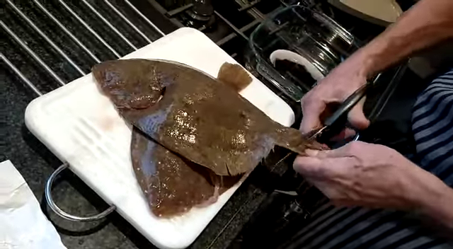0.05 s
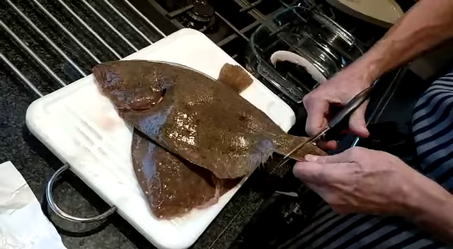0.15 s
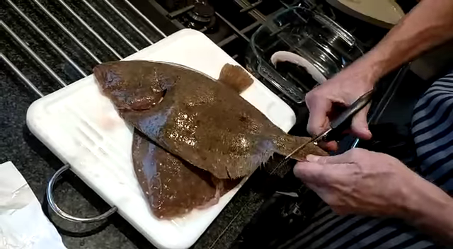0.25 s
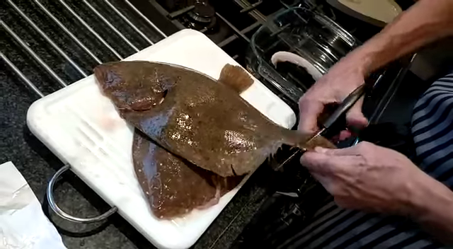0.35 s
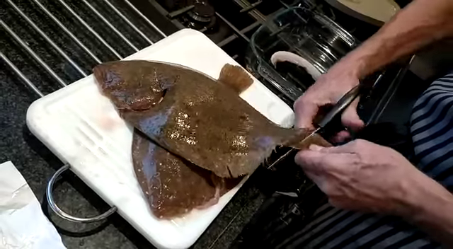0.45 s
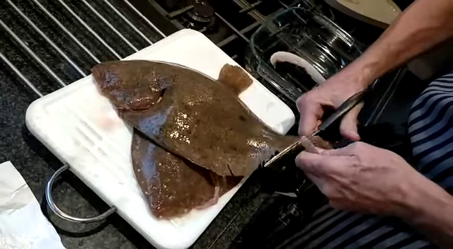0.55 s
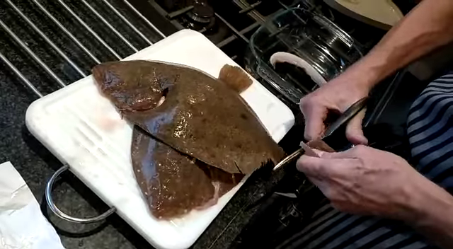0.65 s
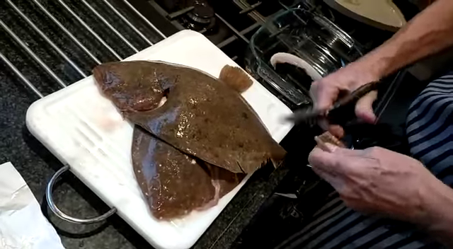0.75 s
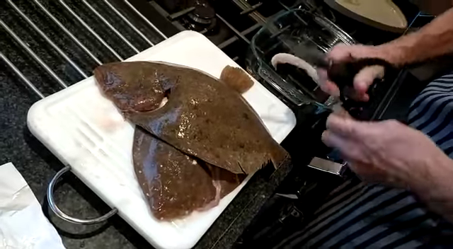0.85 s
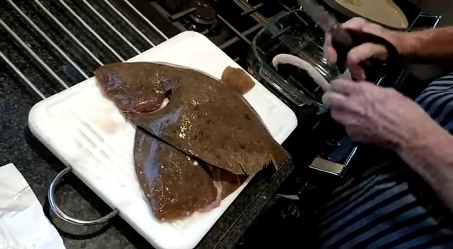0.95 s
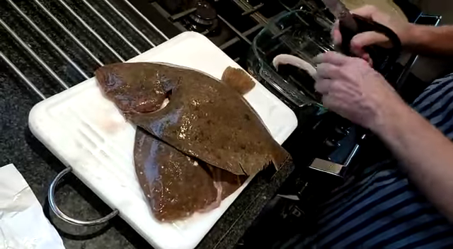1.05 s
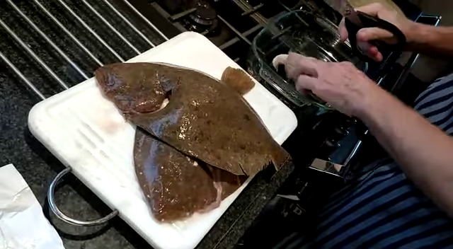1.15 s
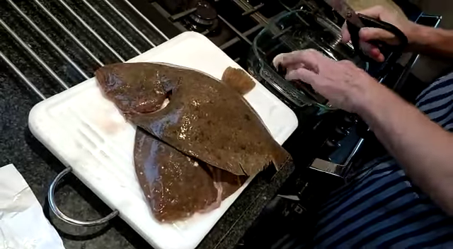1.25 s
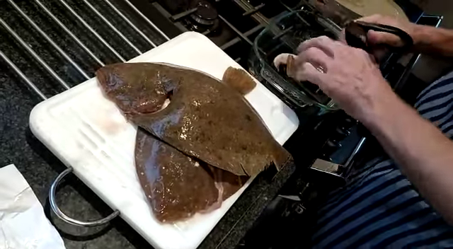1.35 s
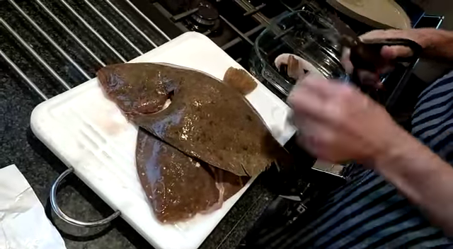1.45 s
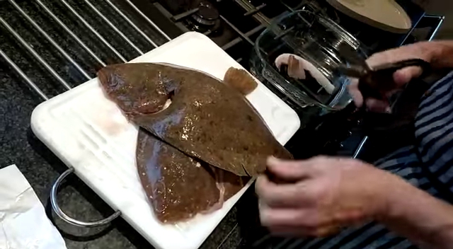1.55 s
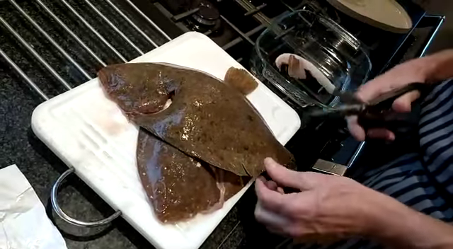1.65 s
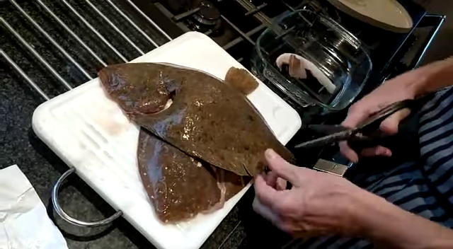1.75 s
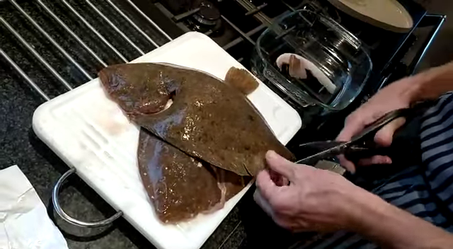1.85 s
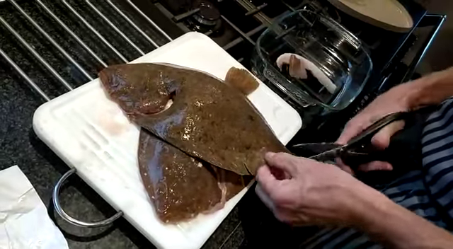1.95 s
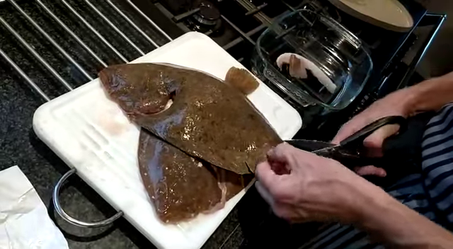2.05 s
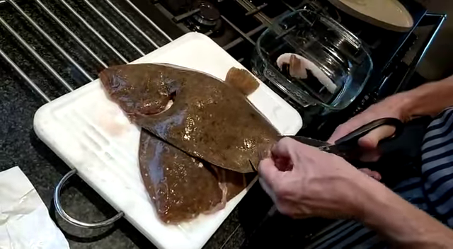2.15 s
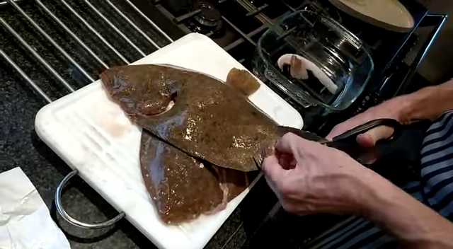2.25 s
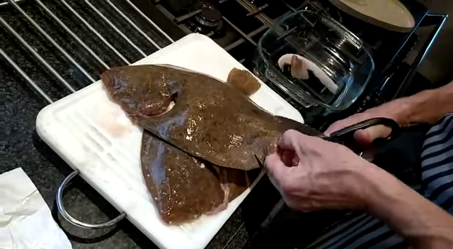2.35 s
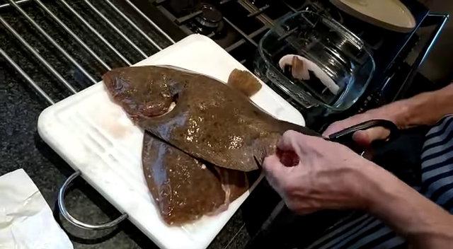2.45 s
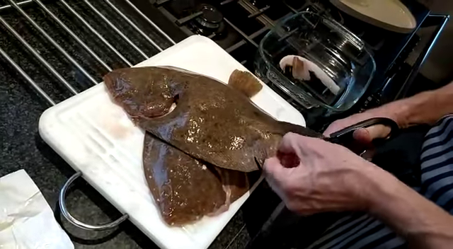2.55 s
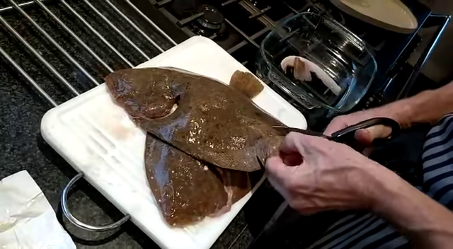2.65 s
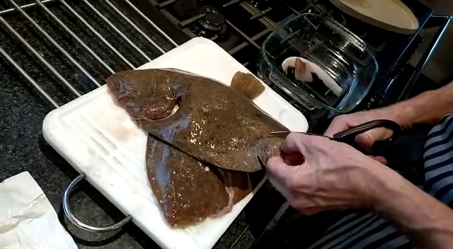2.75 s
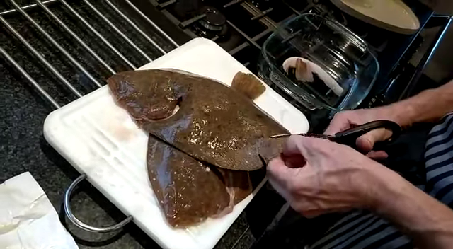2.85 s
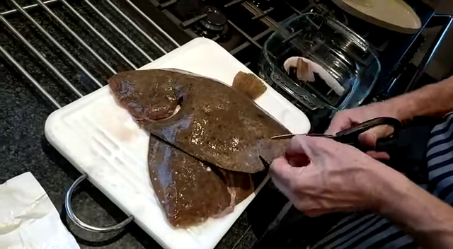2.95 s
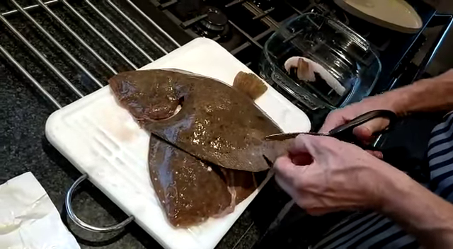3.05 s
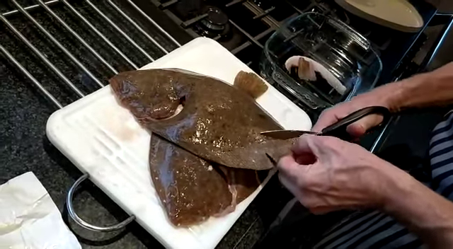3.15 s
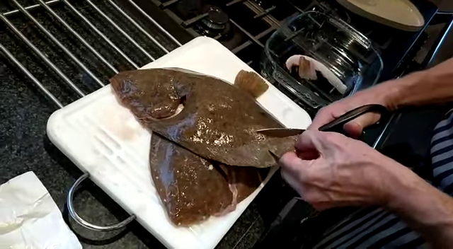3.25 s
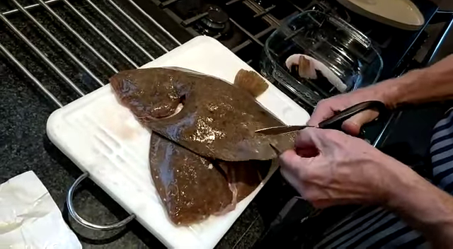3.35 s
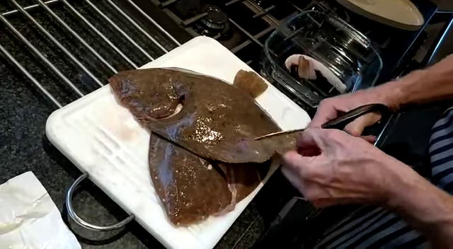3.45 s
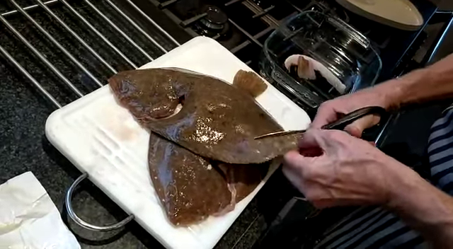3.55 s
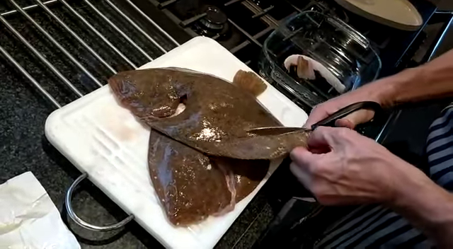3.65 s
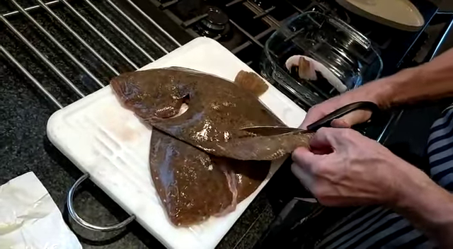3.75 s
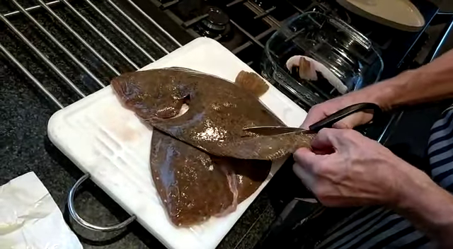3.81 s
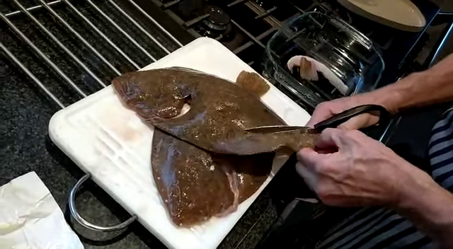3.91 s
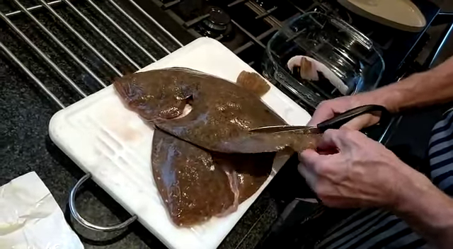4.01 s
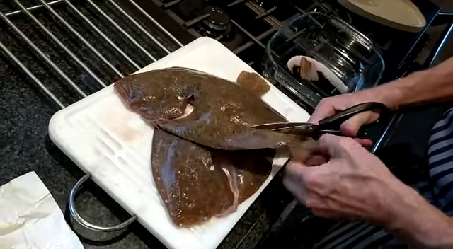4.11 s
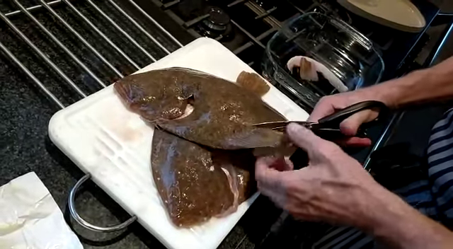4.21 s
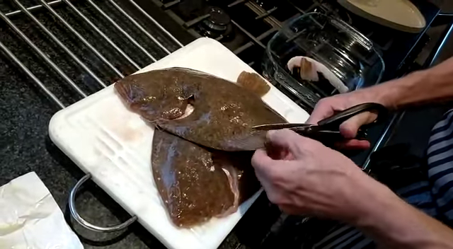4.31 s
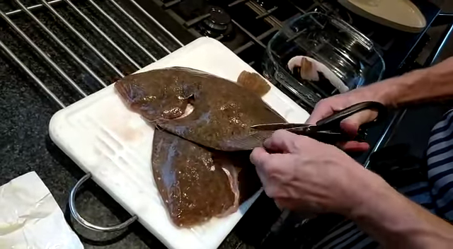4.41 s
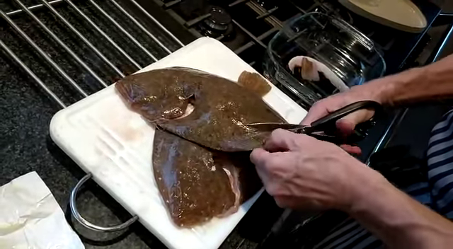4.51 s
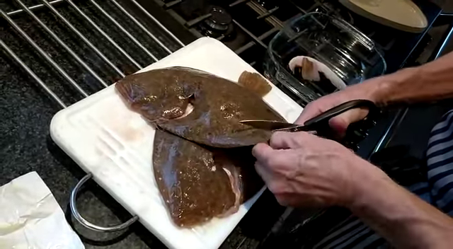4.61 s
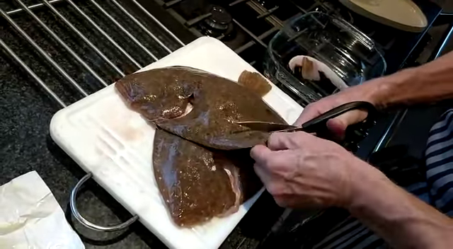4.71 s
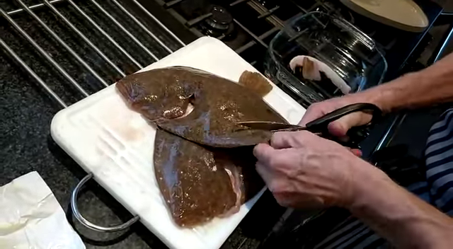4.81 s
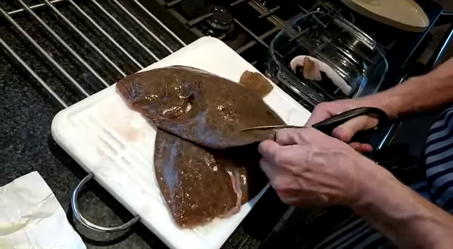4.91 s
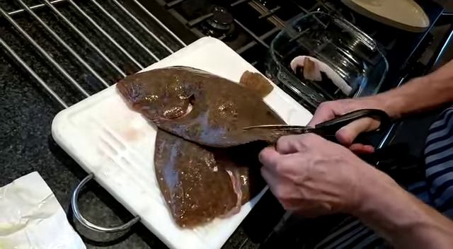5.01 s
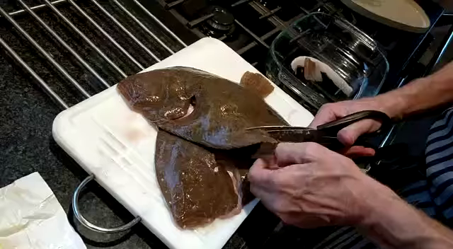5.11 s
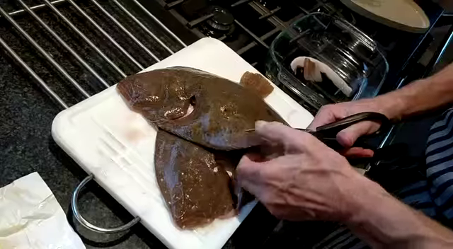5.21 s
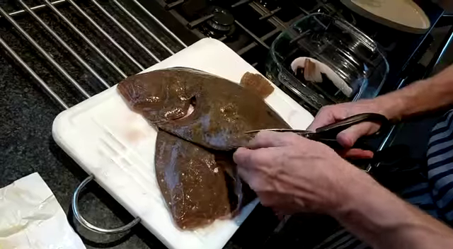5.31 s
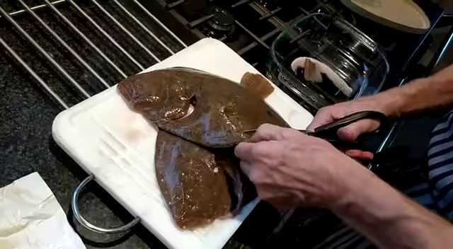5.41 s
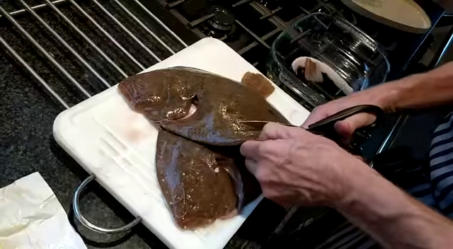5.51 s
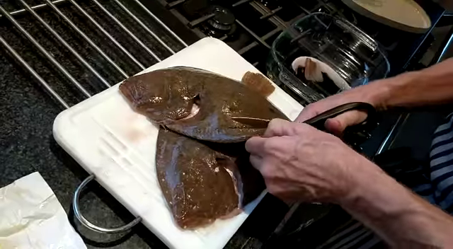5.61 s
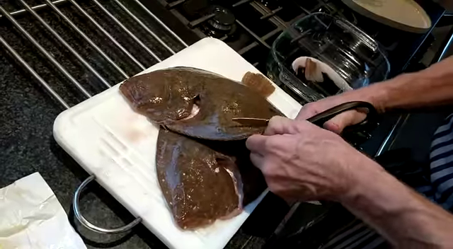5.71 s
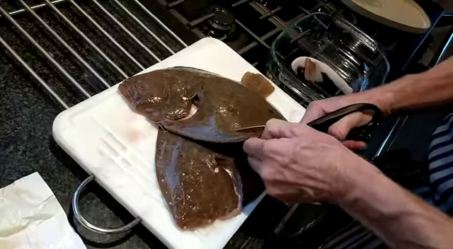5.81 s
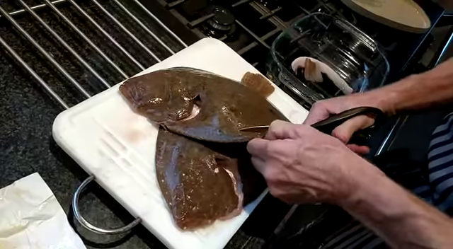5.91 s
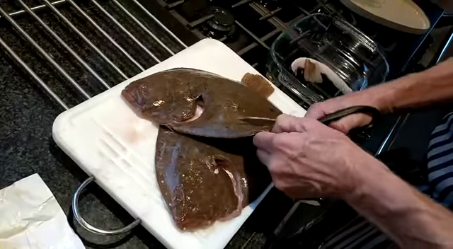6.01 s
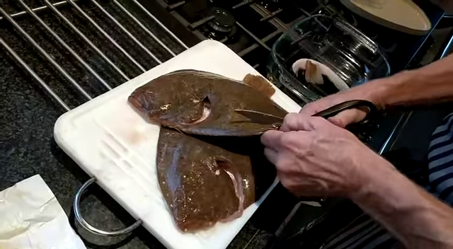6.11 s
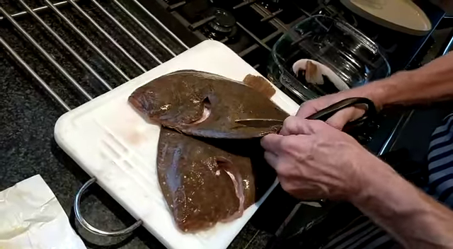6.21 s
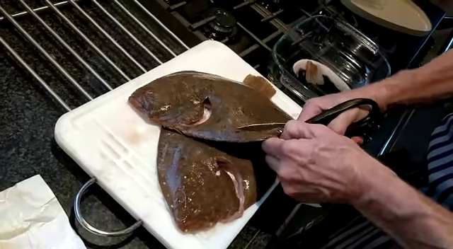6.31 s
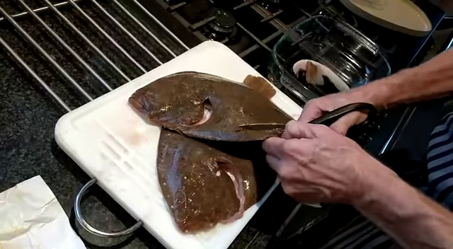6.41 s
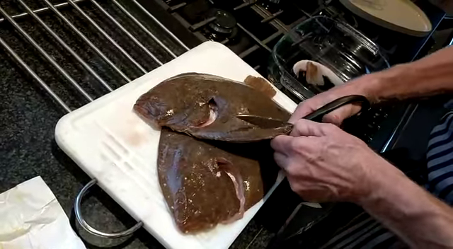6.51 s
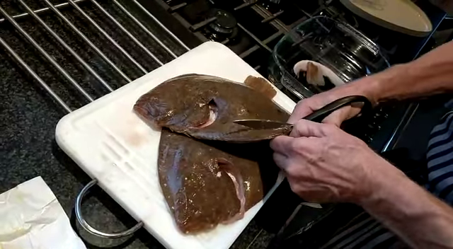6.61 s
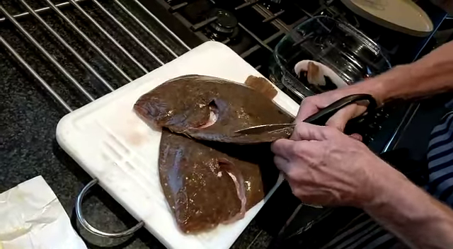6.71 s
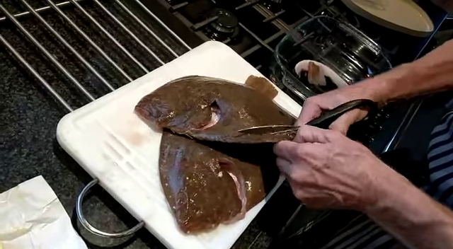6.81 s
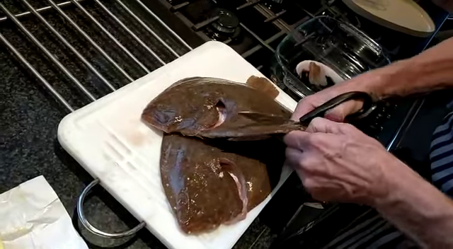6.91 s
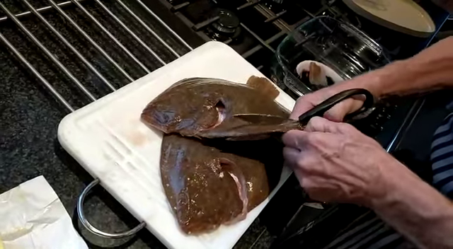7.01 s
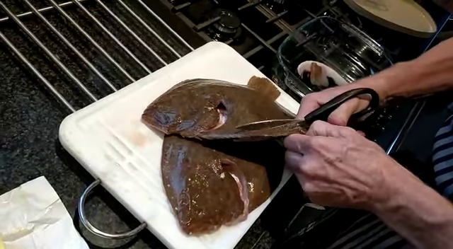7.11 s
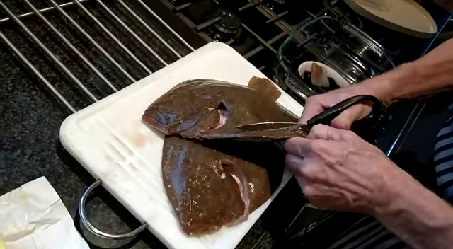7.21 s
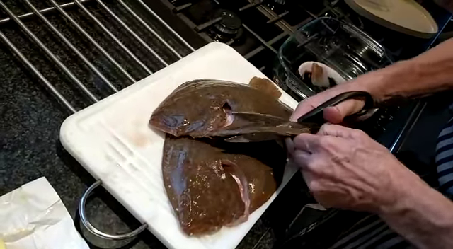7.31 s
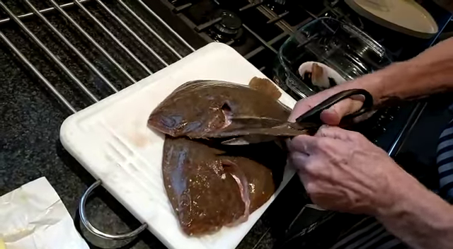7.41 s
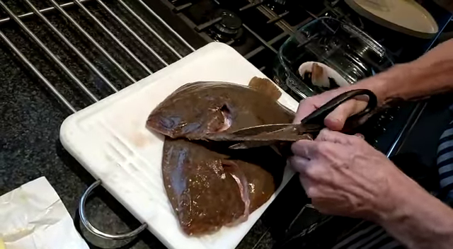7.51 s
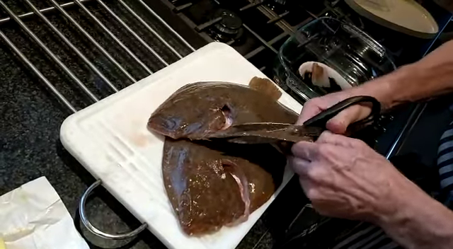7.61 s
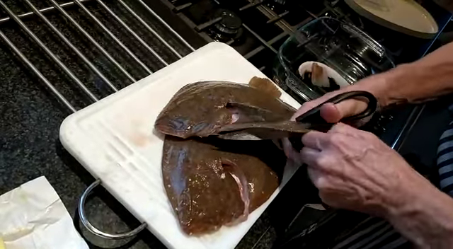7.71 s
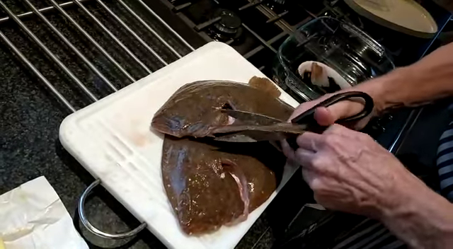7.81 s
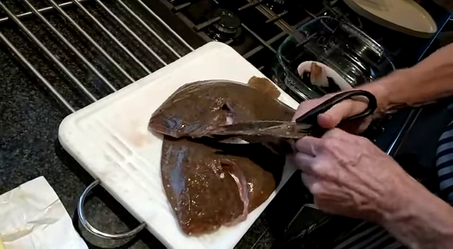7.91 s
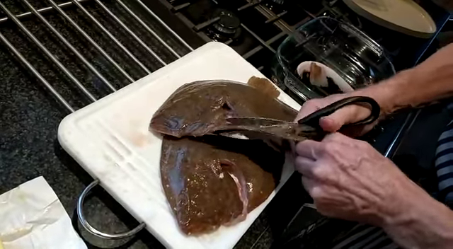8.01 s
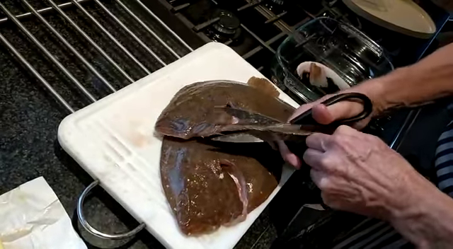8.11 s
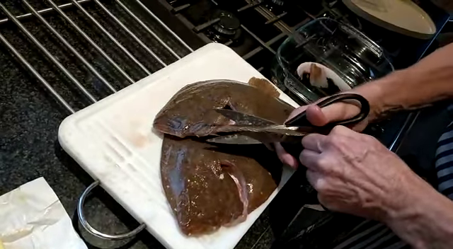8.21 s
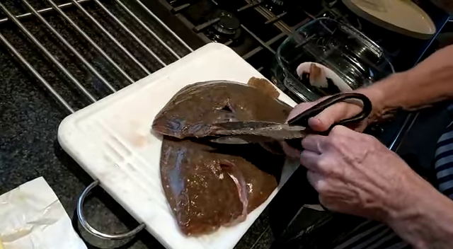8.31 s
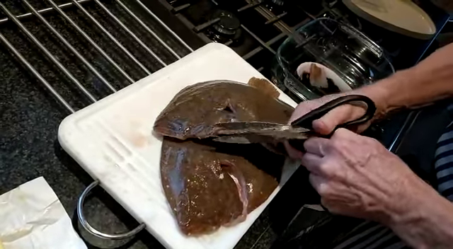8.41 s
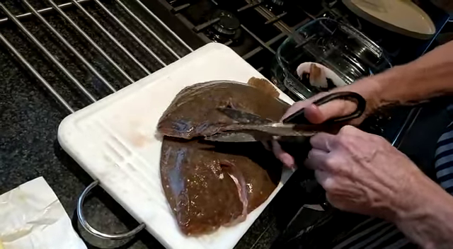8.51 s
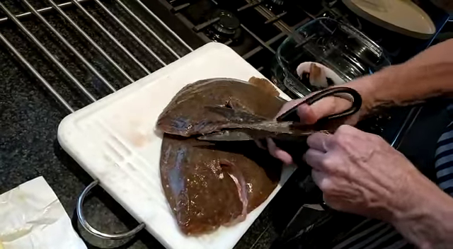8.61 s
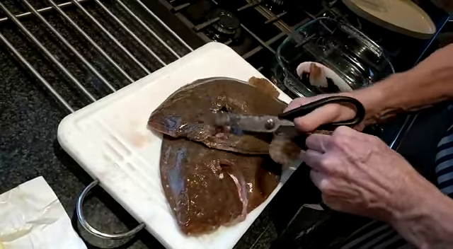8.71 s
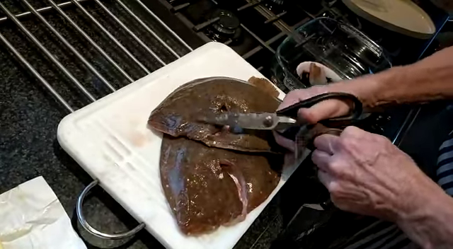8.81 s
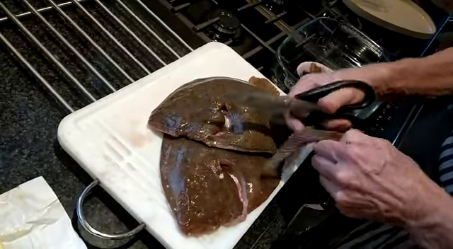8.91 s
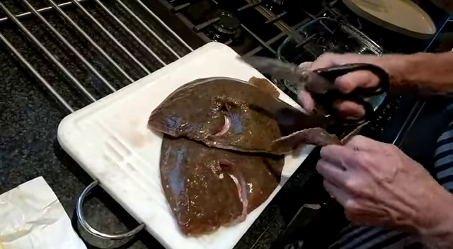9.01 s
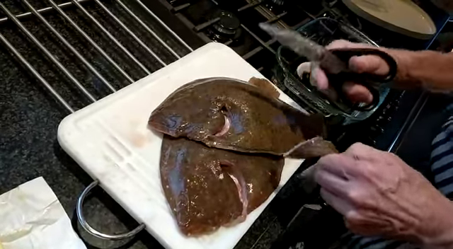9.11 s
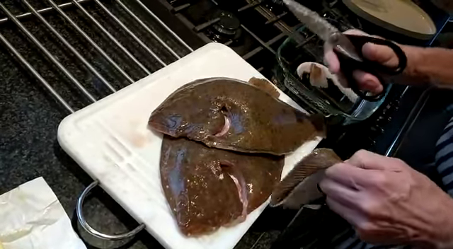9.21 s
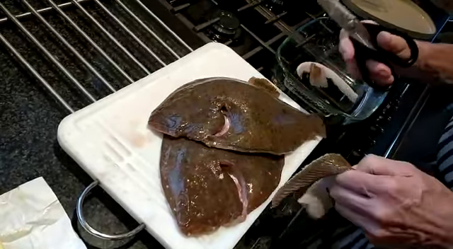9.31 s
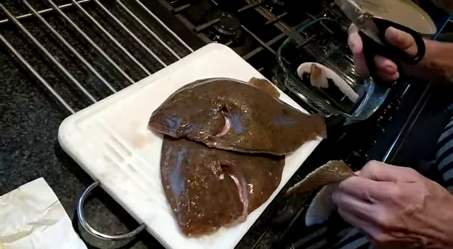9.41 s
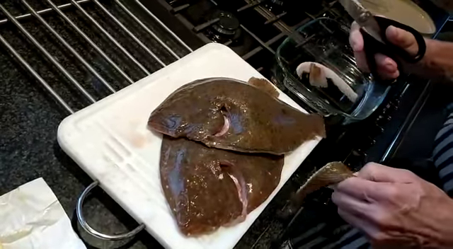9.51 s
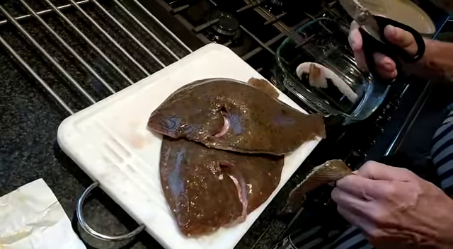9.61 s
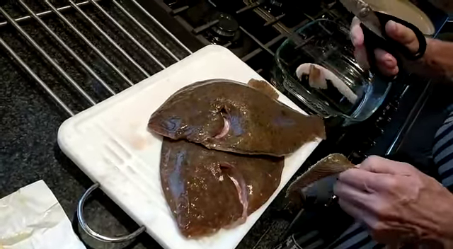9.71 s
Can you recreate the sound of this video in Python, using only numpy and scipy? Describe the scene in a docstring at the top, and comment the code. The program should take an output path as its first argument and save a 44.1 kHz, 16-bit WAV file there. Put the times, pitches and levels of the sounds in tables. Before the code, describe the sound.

Close wet snips and crackling fin bones in a quiet kitchen, the steel blades slamming shut near the start and again near the end.

```python
"""Scissors crunch in uneven bursts and their wet blades rub: fins are trimmed off a raw flatfish in a quiet kitchen.
Fin bones snap as volleys of tiny fractures; the rub is stick-slip impulses over hiss under a wavering grip.
Twice the blades slam shut: a burst of steel noise, a dying ring and a low thump as the slam overloads the microphone.
Between the two fins a scrap slaps into a glass bowl, a noise swell with ringing modes, and slithers down it.
Soft knocks, faint wet ticks, room echoes, low rumble and hiss surround the close cutting."""
import sys
import numpy as np
from scipy import signal
from scipy.fft import rfft, irfft
from scipy.io import wavfile
from scipy.ndimage import uniform_filter1d, map_coordinates

SR = 44100
rng = np.random.default_rng(int(sys.argv[2]) if len(sys.argv) > 2 else 0)


def inscribe(sig):
    """Save sig as 16-bit PCM at rate SR to the path in sys.argv[1].

    A 1-D sig is mono; a 2-D sig holds one channel per row.
    Samples are clipped to [-1, 1] before scaling.
    """
    pcm = np.round(np.clip(np.atleast_2d(sig).T, -1, 1) * 32767)
    wavfile.write(sys.argv[1], SR, pcm.astype(np.int16))


N = 429975

# colour of wet blades and skin rubbing: pitch_hz [Hz], level_db [dB]
RUB_COLOUR = [(60, -21), (300, 2), (800, 6), (1400, 2.5), (2000, -2.5), (2800, 2), (4000, 0.5), (5100, 0.5),
              (6500, -5.5), (9000, -0.5), (16000, 0.5)]
# one row per snip; the blades open, pause, bite and close: bite_s [s], opening_lead_s [s before the bite],
# squeeze_s [s], opening_rub_db [relative dB], closing_rub_db [relative dB], closing_treble_db [dB against the body]
SNIPS = [(0.091, .085, .12, -69, -54, 1), (0.462, .16, 0.054, -61.5, -50, 0),
         (2.702, 0.056, 0.19, -60.5, -48, -1), (3.34, .39, 0.15, -69.5, -42, -12),
         (3.877, 0.36, 0.082, -66.5, -53, -11), (4.809, 0.35, .13, -58.5, -49, 1),
         (5.724, .32, 0.11, -65.5, -47, 0.5), (6.163, 0.19, .15, -58.5, -54, 8),
         (6.605, 0.18, 0.13, -58, -47.5, 1), (6.997, .16, .135, -56, -45, -2),
         (7.417, 0.17, 0.091, -58, -47, 3), (7.811, 0.18, 0.094, -59.5, -46, 9),
         (8.222, 0.18, 0.13, -58, -52, 11), (8.64, 0.18, 0.079, -58, -48.5, 3)]


def amp(db):
    """Turns decibels into an amplitude factor."""
    return 10 ** (np.asarray(db) / 20)


def evened(x):
    """Scales a sound to rms 1."""
    return x / np.sqrt(np.mean(x ** 2) + 1e-20)


def read(points, hz):
    """Reads a table of frequencies and values on a log-frequency axis."""
    table_hz, value = np.transpose(points)
    return np.interp(np.log(hz + 1), np.log(table_hz + 1), value)


def add(mix, start_s, sound):
    """Lays a sound into the mix at start_s."""
    part = mix[max(round(start_s * SR), 0):][:len(sound)]
    part += sound[:len(part)]


def colour(x, points, size=2048):
    """Filters causally (minimum phase) to a spectrum drawn in Hz and dB."""
    log_gain = np.log(amp(read(points, abs(np.fft.fftfreq(size, 1 / SR)))))
    minimum_phase = np.exp(np.conj(signal.hilbert(log_gain)))
    taps = np.fft.ifft(minimum_phase).real[:size // 2]
    return signal.oaconvolve(x, taps)[:len(x)]


def ring(modes, t):
    """Sums the exponentially dying sine modes of a struck object."""
    return sum(amp(db - 60 * t / t60) * np.sin(2 * np.pi * hz * t) for hz, db, t60 in modes)


def voiced(x, treble_db, split_hz=9500):
    """Sets the body of a sound to rms 1 over its own length and its treble against that."""
    padded = np.pad(x, (0, SR // 500))  # room for the filters to ring out
    body = signal.sosfilt(signal.butter(4, split_hz, "low", fs=SR, output="sos"), padded)
    treble = signal.sosfilt(signal.butter(4, split_hz, "high", fs=SR, output="sos"), padded)
    balanced = evened(body) + amp(treble_db) * evened(treble)
    return balanced * np.sqrt(len(padded) / len(x))


def noise_pair(size):
    """Makes stereo white noise that is more alike left and right in the bass than in the treble."""
    # likeness of left and right in the room: pitch_hz [Hz], likeness [0-1]
    likeness = [(30, .85), (130, 0.7), (260, 0.9), (500, 0.4), (1000, .1), (16000, 0)]
    left, other = rfft(rng.standard_normal((2, size)))
    same = read(likeness, np.fft.rfftfreq(size, 1 / SR))
    right = same * left + np.sqrt(1 - same ** 2) * other
    return irfft(np.array([left, right]), size)


def room_tone(level_db=-60):
    """Shapes steady stereo noise into low rumble and faint hiss."""
    # spectrum of the quiet kitchen: pitch_hz [Hz], density_db [relative dB per Hz]
    hush = [(20, 4), (50, -3), (80, -5), (130, -9.5), (250, -13.5), (500, -18), (1000, -24.5), (1600, -29),
            (2100, -28), (2700, -29.5), (6000, -30.5), (9000, -37.5), (14000, -27.5), (16000, -27)]
    shape = amp(read(hush, np.fft.rfftfreq(N, 1 / SR)))
    return amp(level_db) * evened(irfft(rfft(noise_pair(N)) * shape, N))


def kitchen(x, scatter_t60=0.031, rise_s=0.0049, count=4):
    """Adds quick scatter off board and counter, then the room's tail; the echoes shift as the hands move."""
    # decay of the room: pitch_hz [Hz], t60_s [s]
    room_t60 = [(100, 0.55), (500, .5), (2000, 0.47), (5500, .5), (8000, 0.44), (12000, 0.42),
                (16000, 0.32)]
    # colour of the tail: pitch_hz [Hz], level_db [dB]
    tail_colour = [(100, -7), (1000, 0), (5000, -7), (8000, -8.5), (12000, -14), (16000, -14.5)]
    # colour of the scatter off board and counter: pitch_hz [Hz], level_db [dB]
    scatter_colour = [(100, 0.5), (1000, 2.5), (5000, -1.5), (14000, -6)]
    out = np.zeros((2, N))
    t, scene_s = np.arange(SR * 3 // 4) / SR, np.arange(N) / SR
    for k in range(count):
        # the tail dies at its own rate in each frequency band
        hz, frame_s, bands = signal.stft(noise_pair(len(t)), SR, nperseg=256)
        t60 = read(room_t60, hz)[:, None]
        dying = bands * amp(-60 * frame_s / t60) / np.sqrt(t60)
        tail = signal.istft(dying, SR)[1][:, :len(t)] * (1 - np.exp(-t / rise_s))
        scatter = noise_pair(len(t)) * amp(-60 * t / scatter_t60)
        echoes = []
        for late, early in zip(tail, scatter):
            late = colour(late / np.linalg.norm(late), tail_colour)
            early = colour(early / np.linalg.norm(early), scatter_colour)
            echoes.append(late + early)
        # slow swings in quadrature pairs hold the summed power constant
        swing = np.cos(np.pi * (scene_s * (k // 2 + 1) * 0.6853 + k / 2))
        share = swing * np.sqrt(2 / count)
        out += signal.oaconvolve((x * share)[None], np.array(echoes), axes=1)[:, :N]
    return out


def handling(slap_s=0.0035, bowl_db=-7, smack_noise=0.82):
    """A scrap slaps into the bowl and rings its modes; flesh and board give soft, dying knocks."""
    # a scrap landing in the bowl: start_s [s], level_db [relative dB]
    drops = [(1.207, -38), (1.325, -57)]
    # ring of the glass bowl: pitch_hz [Hz], level_db [relative dB], t60_s [s]
    bowl_modes = [(707, -3.5, 0.13), (980, 5, 0.053), (1220, -20.5, 0.097), (4770, -7, 0.092),
                  (5240, -7.5, 0.084), (5450, -4.5, 0.11)]
    # soft knocks and wet smacks: start_s [s], level_db [relative dB], pitch_hz [Hz], t60_s [s]
    smacks = [(1.533, -50, 1112, 0.014), (1.65, -57.5, 1360, 0.022), (1.722, -44.5, 750, 0.015),
              (2.194, -44, 2200, 0.009), (3.262, -55.5, 2300, 0.0048), (3.877, -32.5, 836, 0.018),
              (6.478, -47.5, 698, 0.07), (6.77, -52, 690, 0.078), (6.875, -55, 690, 0.054),
              (8.512, -57, 1070, .03), (9.236, -48.5, 1490, 0.011)]
    out, t = np.zeros(N), np.arange(SR // 2) / SR
    onset = 1 - np.exp(-t / 0.00033)
    for start_s, level_db in drops:
        slap = rng.standard_normal(len(t)) * t / slap_s * np.exp(1 - t / slap_s)
        add(out, start_s - slap_s, amp(level_db) * slap)  # the slap peaks as the ring starts
        add(out, start_s, amp(level_db + bowl_db) * onset * ring(bowl_modes, t))
    for start_s, level_db, pitch_hz, t60 in smacks:
        puff = signal.lfilter(*signal.iirpeak(pitch_hz, 2, fs=SR), rng.standard_normal(len(t)))
        knock = np.sin(2 * np.pi * pitch_hz * t) + smack_noise * evened(puff)
        add(out, start_s, amp(level_db - 60 * t / t60) * onset * knock)
    return colour(out, [(100, -1), (5500, -2.5), (8000, -5), (12000, -3.0)])


def wet_ticks(ticks_per_s=22, ticks_db=-57.0, spread_db=4.0):
    """Sticky skin parts from fingers and steel in faint, randomly timed impulses."""
    size = amp(ticks_db + spread_db * np.minimum(rng.exponential(1, N), 3))
    return colour(size * (rng.random(N) < ticks_per_s / SR), RUB_COLOUR)


def clacks(chatter_s=0.00188, ring_db=-32, treble_db=2, thump_s=0.001):
    """Steel chatters on steel for a few milliseconds and rings on; the slam overloads the microphone in a low thump."""
    # blades slamming shut: start_s [s], level_db [relative dB], thump_db [relative dB, level of the overload thump]
    slams = [(0.5282, -17, -25), (8.715, -17.5, -23)]
    # colour of steel striking steel: pitch_hz [Hz], level_db [dB]
    steel_colour = [(150, -11.5), (450, -16), (850, -9.5), (1350, -15), (1700, -14), (2020, -4.5),
                    (2400, -11.5), (3300, -4.5), (4200, -8.5), (5000, 1), (6200, -3.5), (8000, -4.5),
                    (10000, -4), (15000, -4.5)]
    # ring of the blades: pitch_hz [Hz], level_db [relative dB, before a random spread], t60_s [s]
    blade_modes = [(2280, -11, .3), (3630, -17, .3), (4280, 2, 0.15), (4350, -6.5, 0.41), (5440, -7, .35),
                   (4900, 0, .45), (5430, -2, .4), (5900, -1.5, 0.48), (5600, -1, .42), (6300, 0.5, .45),
                   (8500, -4.5, .4), (11640, 3, 0.71)]
    contact, after, t = np.zeros(N), np.zeros(N), np.arange(SR // 2) / SR
    fade = np.exp(-t[:SR // 200] / chatter_s)
    for start_s, level_db, thump_db in slams:
        # hard contacts excite all frequencies about equally
        spectrum = rfft(rng.standard_normal(len(fade)) * fade, 2 * len(fade))
        chatter = irfft(spectrum / abs(spectrum))[:len(fade)] * np.sqrt(fade)
        add(contact, start_s, amp(level_db) * voiced(chatter, treble_db))
        # no two blows land alike
        modes = [(hz, mode_db + rng.normal(0, 2), t60) for hz, mode_db, t60 in blade_modes]
        add(after, start_s, amp(level_db + ring_db) * ring(modes, t))
        # the overload thump is a single one-sided pulse
        add(after, start_s, amp(thump_db) * t / thump_s * np.exp(1 - t / thump_s))
    return colour(contact, steel_colour), after


def strokes():
    """Lists each snip's light opening rub, press into the skin and hard closing rub through the flesh."""
    open_share, open_treble_db = .64, 4  # share of the time until the bite spent opening
    press_s, press_db, press_treble_db = 0.027, -60, 4.5  # press_s lies either side of the bite
    grip_share = 0.16  # share of the squeeze that passes before the edges rub hard
    rubs = []
    for bite, lead, squeeze, open_db, close_db, close_treble_db in SNIPS:
        rubs.append((bite - lead, bite - (1 - open_share) * lead, open_db, open_treble_db))
        rubs.append((bite - press_s, bite + press_s, press_db, press_treble_db))
        rubs.append((bite + grip_share * squeeze, bite + squeeze, close_db, close_treble_db))
    return rubs


def blades(slips_per_s=2600, spread_db=4, hiss=0.39, fade=0.8, slides_db=-2.5, rasp_db=2, rasp_s=.009):
    """The edges stick and slip thousands of times a second over a fine hiss; their grip comes and goes."""
    # the scrap slithers down the glass just after it lands: start_s [s], end_s [s]
    slither_span = (1.295, 1.385)
    slither_db, slither_treble_db = -60, 2
    slip_size = amp(spread_db * np.minimum(rng.exponential(1, N), 5))
    slips = (rng.random(N) < slips_per_s / SR) * rng.choice([-1, 1], N) * slip_size
    wander = uniform_filter1d(rng.standard_normal(N), int(rasp_s * SR))
    grip = amp(rasp_db * evened(wander))
    friction = grip * (evened(slips) + hiss * rng.standard_normal(N))
    out = np.zeros(N)
    for start_s, end_s, level_db, treble_db in strokes() + [(*slither_span, slither_db, slither_treble_db)]:
        length = max(int((end_s - start_s) * SR), SR // 100)
        stroke = friction[max(int(start_s * SR), 0):][:length]
        swell = signal.windows.tukey(len(stroke), fade)
        add(out, start_s, amp(level_db) * voiced(stroke * swell, treble_db))
    return amp(slides_db) * colour(out, RUB_COLOUR)


def splinters(count=4, length_s=.0022, level_db=-43.5, spread_db=2.5, treble_db=3):
    """Thin fin rays splinter in a few small cracks at random moments between each bite and close."""
    cracks = []
    for bite, _, squeeze, *_ in SNIPS:
        for place, size in zip(rng.random(count), rng.standard_normal(count)):
            cracks.append((bite + place * squeeze, length_s, level_db + spread_db * size, treble_db))
    return cracks


def bones(spread_db=6, cracks_db=-6.5, count=16):
    """A bone gives way in a quick volley of very uneven tiny fractures; the pivot ticks in the same way."""
    # thick fin bones snapping: start_s [s], length_s [s], level_db [relative dB], treble_db [dB against the body]
    snaps = [(0.0521, 0.0013, -41.5, -4), (0.0798, 0.0041, -36, -12), (0.0955, 0.0089, -23, 2.5),
             (0.1497, 0.0074, -21, 1.5), (0.2015, .0014, -31.5, 3), (0.4632, .001, -40.5, 1),
             (0.4682, .0034, -29, 3.5), (0.4877, 0.0084, -24, 5), (0.519, 0.0052, -26, 6),
             (0.5367, .001, -35, 0), (2.7165, 0.014, -44.5, 6), (2.7512, 0.008, -37.5, 1),
             (2.7943, 0.013, -31.5, -0.5), (2.8382, 0.008, -33, 0), (3.3466, 0.0089, -28.5, -1),
             (3.3713, 0.0043, -31.5, 3), (3.394, .01, -29.5, 2), (3.4392, 0.0071, -27, -0.5),
             (3.8762, 0.0067, -28.5, 4), (3.9177, .0014, -30, 5), (3.9609, .002, -36, -1),
             (4.066, 0.00077, -46, -2), (4.8095, 0.0018, -43, -9), (4.8422, 0.014, -34, 3.5),
             (4.8878, 0.011, -34.5, 3), (4.9537, 0.0058, -33, -4), (5.4922, 0.0044, -48, 1),
             (5.7117, 0.0043, -45.5, 0), (5.7377, .0066, -33, 0), (5.7738, 0.0095, -38, -2),
             (5.8656, 0.00097, -38.5, 2), (6.1639, 0.0038, -40, 1), (6.1919, .005, -33.5, 2),
             (6.2373, 0.0037, -37, -10), (6.2502, 0.0037, -34.5, 8), (6.2692, 0.0026, -35, 3),
             (6.6044, 0.0099, -31, 0), (6.6419, 0.0073, -30.5, 4), (6.674, 0.0051, -32.5, 0.5),
             (6.6895, .0016, -36.5, -8), (6.9961, 0.0053, -32.5, -3), (7.0395, 0.0077, -29, -1),
             (7.0694, 0.01, -29, 1), (7.1213, 0.0097, -32.5, 2), (7.4173, 0.0058, -35, 8.5),
             (7.447, 0.0021, -31, -2), (7.4637, 0.0038, -34.5, 8.5), (7.4994, 0.0022, -39.5, -4),
             (7.8055, 0.0059, -37, 9), (7.8366, 0.0079, -33.5, 2), (7.8978, 0.0035, -33, 5.5),
             (8.2183, 0.011, -45.5, 9.5), (8.2692, 0.006, -30, 6.5), (8.2973, 0.0098, -32, 9),
             (8.3602, 0.0043, -33.5, -3), (8.6022, 0.016, -46.5, 8), (8.6538, 0.0021, -30.5, 0.5),
             (8.6914, 0.0055, -45, 2), (8.7085, 0.0032, -37, 10)]
    # thin, bright ticks of the loose pivot: start_s [s], level_db [relative dB]
    pivot_ticks = [(4.008, -65), (4.044, -60), (4.4505, -56), (5.4556, -59), (6.0814, -49), (7.729, -51.5),
                   (7.7384, -51.5), (8.6997, -45)]
    pivot_length_s, pivot_treble_db = 0.0023, 18
    # colour of a cut through fish: pitch_hz [Hz], level_db [dB]
    flesh_colour = [(40, -12.5), (130, -4.5), (340, -1.5), (560, -3), (780, -1.5), (1100, 0.5),
                    (1400, -5.5), (1950, 3.5), (2700, -5.5), (4500, -3), (6500, -5.5), (9000, -2.5),
                    (16000, 0)]
    ticks = [(start_s, pivot_length_s, level_db, pivot_treble_db) for start_s, level_db in pivot_ticks]
    out = np.zeros(N)
    for start_s, length_s, level_db, treble_db in snaps + splinters() + ticks:
        place, size, sign = rng.random((3, count))
        volley = np.zeros(max(int(length_s * SR), count))
        at = ((place - place.min()) * len(volley)).astype(int)  # the first fracture opens the volley
        fracture = np.sign(sign - .5) * amp(-spread_db * np.log(np.maximum(size, .05)))
        np.add.at(volley, at, fracture)
        add(out, start_s, amp(level_db) * voiced(volley, treble_db))
    return amp(cracks_db) * colour(out, flesh_colour)


def at_ports(x):
    """The direct sound reaches one port a little before the other."""
    # the scissors move across the microphone: time_s [s], left_lag_ms [ms, negative when left leads]
    left_lag = [(0, .05), (2.8, .045), (3.3, -.04), (7.2, -.02), (8.3, -.06), (8.7, .045)]
    n = np.arange(N)
    lag_samples = np.interp(n / SR, *np.transpose(left_lag)) * SR / 1000
    return np.array([x, map_coordinates(x, [n + lag_samples], order=5)])


def scene(clack_direct_db=-10.5, clack_room_db=5.5, direct_db=-1.5, blades_db=-5.0):
    """Direct sound and kitchen echoes reach two ports; the hard clacks fill the room most."""
    # colour of the left microphone port: pitch_hz [Hz], level_db [dB]
    left_port = [(100, -5), (4000, 2), (6500, 8.5), (7800, -1.5), (8800, -5), (10000, -1.5), (11500, 6.5),
                 (13000, 16), (14600, 16.5), (15700, 11.5), (16100, -4)]
    # colour of the right microphone port: pitch_hz [Hz], level_db [dB]
    right_port = [(100, -3.5), (2800, -0.5), (5000, 8), (6300, 7), (7500, 10), (8300, 5.5), (8900, -10),
                  (10500, 0), (12000, -2.5), (14000, 4.5), (15700, -3), (16100, -23.5)]
    handled = handling()
    clack, after_ring = clacks()
    cutting = bones() + amp(blades_db) * blades() + wet_ticks()
    near = amp(direct_db) * (cutting + amp(clack_direct_db) * clack + after_ring + handled)
    echoes = kitchen(cutting + amp(clack_room_db) * clack + handled)
    left, right = at_ports(near) + echoes
    return np.array([colour(left, left_port), colour(right, right_port)]) + room_tone()


def record(dry, ceiling=.96, edge_hz=16100):
    """The loudest peaks overload softly; then a steep low-pass limits the band."""
    limited = ceiling * np.tanh(dry / ceiling)
    low_pass = signal.firwin(401, edge_hz, window=("kaiser", 8), fs=SR)
    return signal.oaconvolve(limited, low_pass[None], "same")


dry = scene()
out = record(dry)
inscribe(out)
```